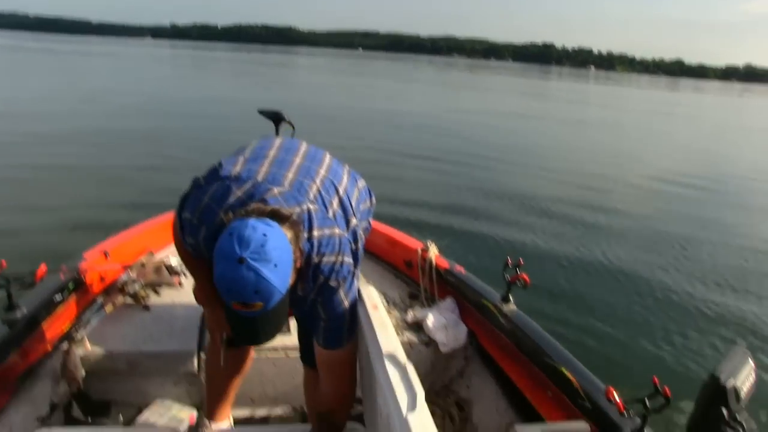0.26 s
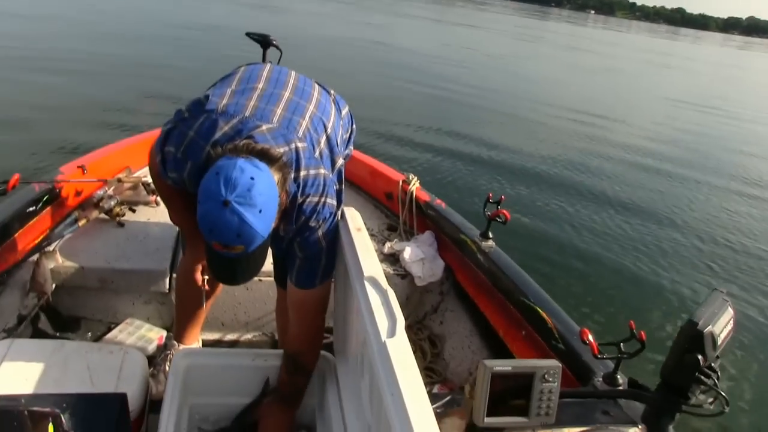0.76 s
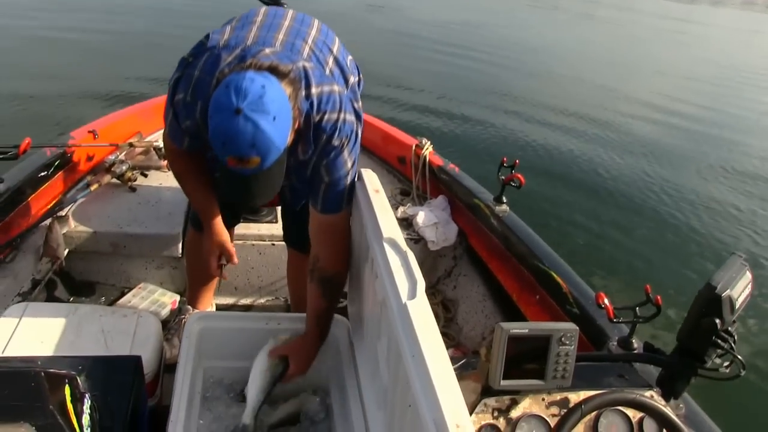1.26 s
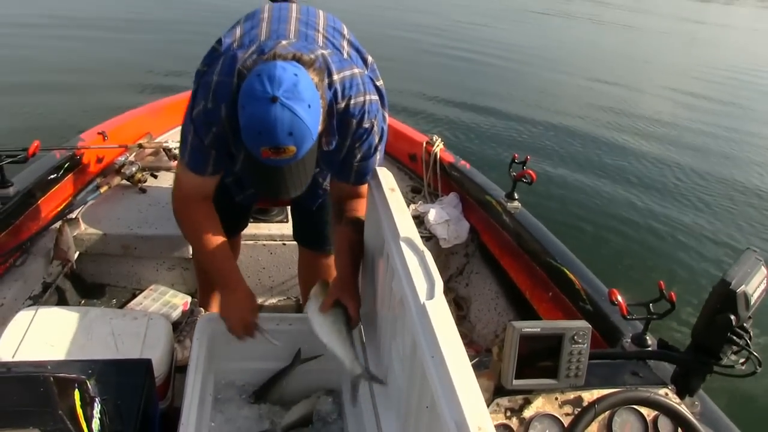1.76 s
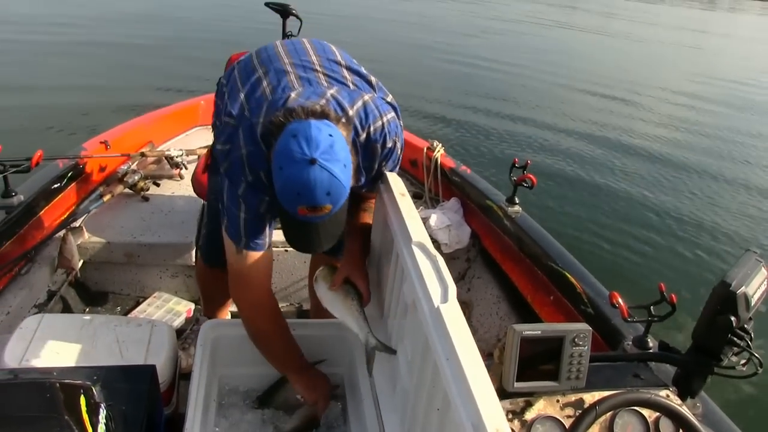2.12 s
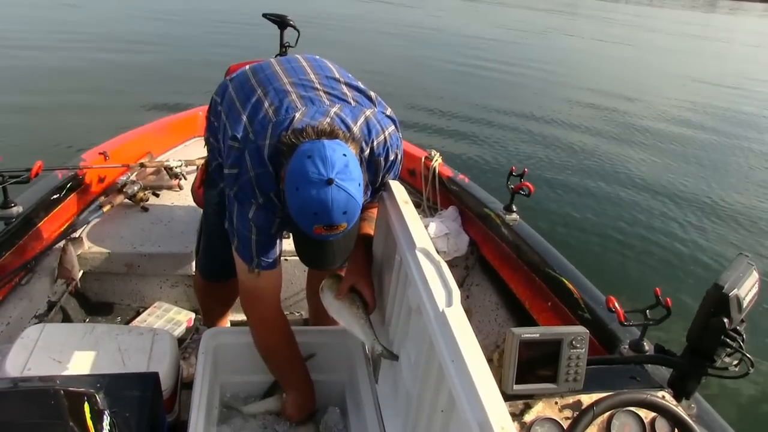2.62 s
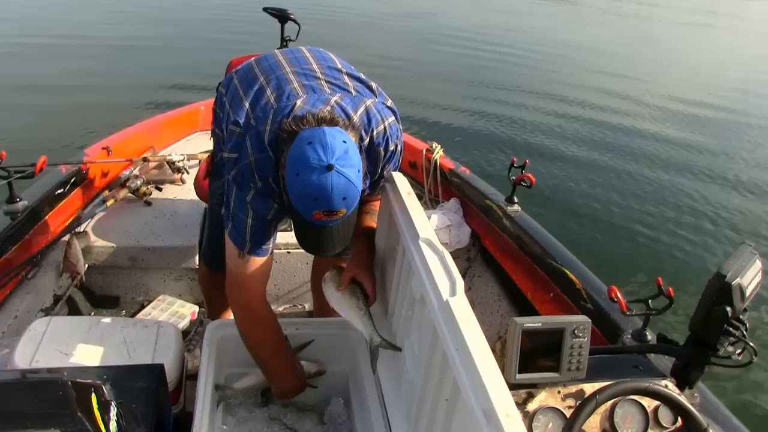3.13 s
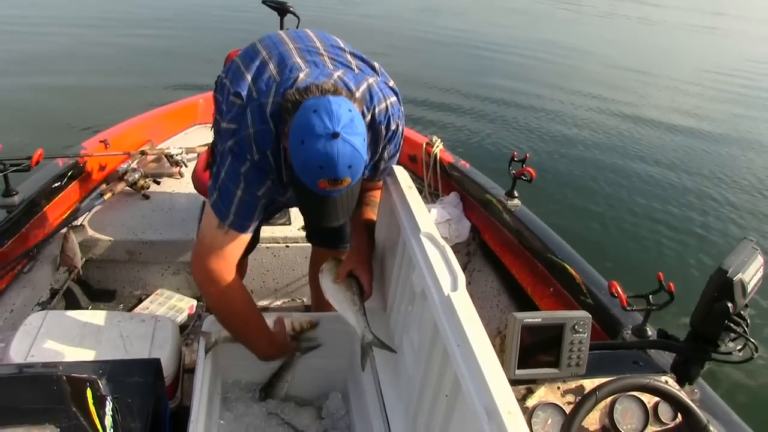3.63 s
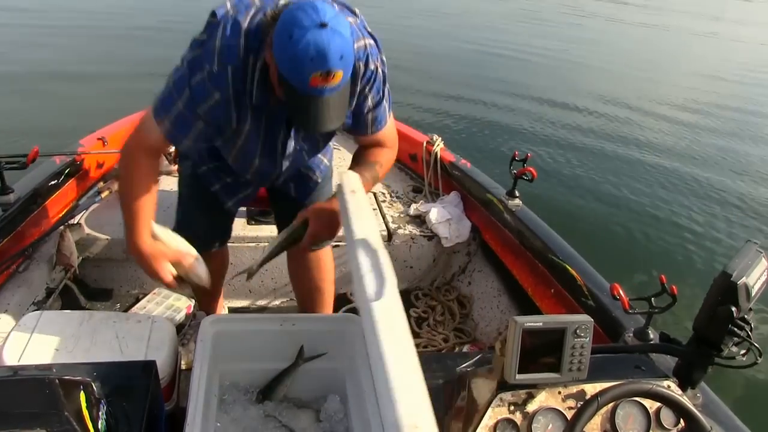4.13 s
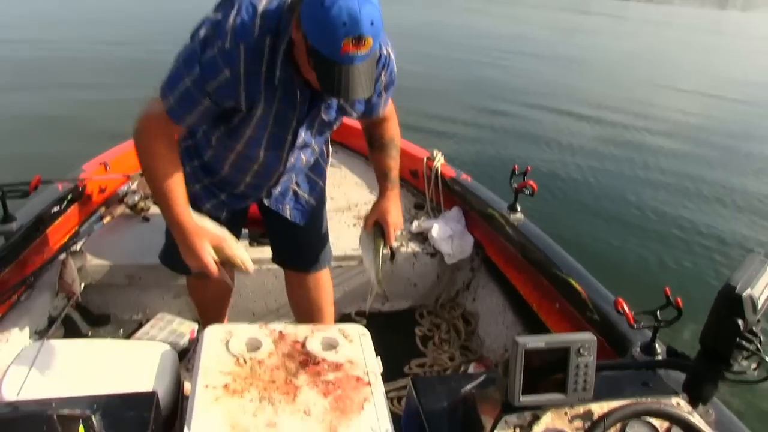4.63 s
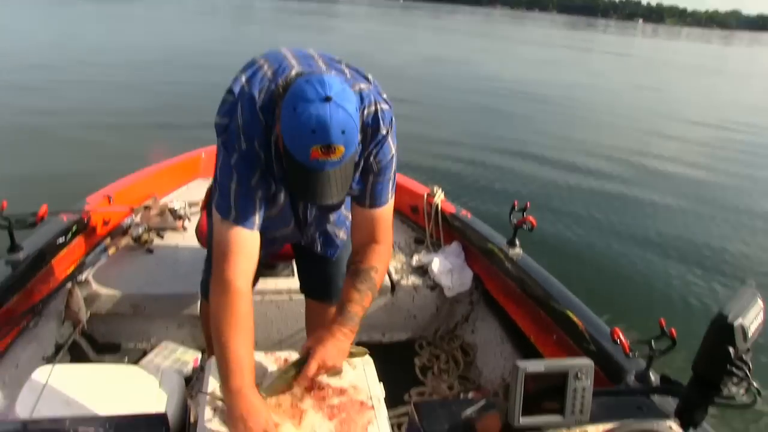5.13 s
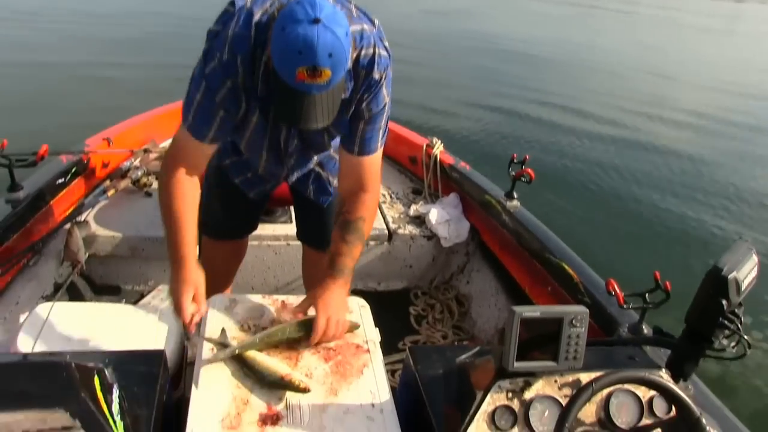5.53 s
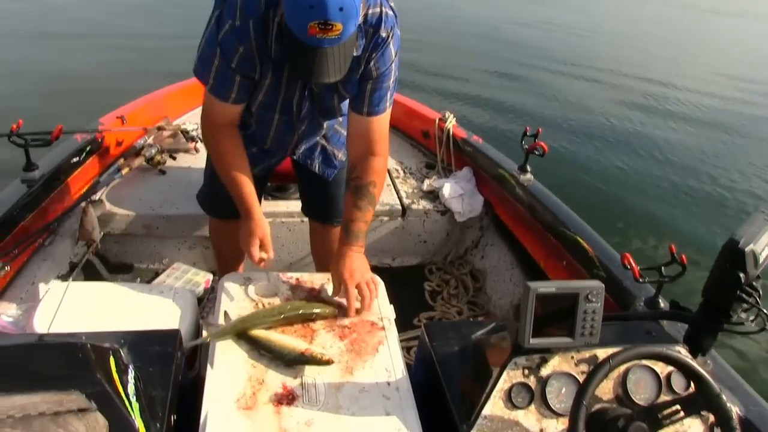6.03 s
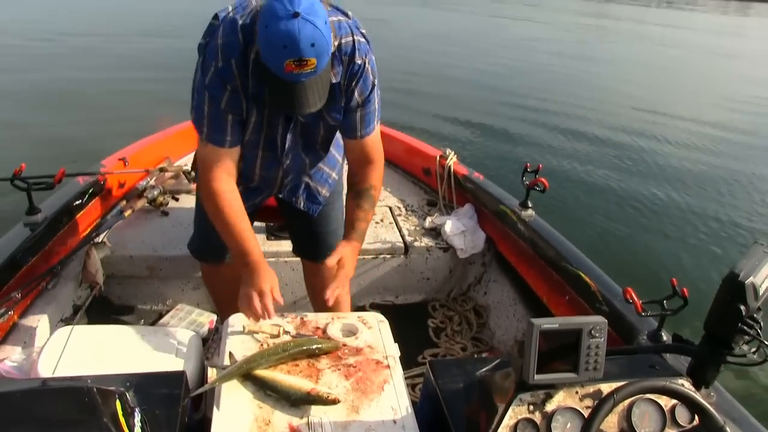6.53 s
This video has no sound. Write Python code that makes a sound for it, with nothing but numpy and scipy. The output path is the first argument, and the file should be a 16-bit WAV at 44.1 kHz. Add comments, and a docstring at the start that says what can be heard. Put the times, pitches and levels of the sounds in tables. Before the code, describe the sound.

On a small boat on a lake, hands dig through crushed ice in a plastic cooler. The ice crunches in bursts while bigger chunks clack together and knock the walls. The digging thins to light ticks, then the lid drops shut with a thump. Fish slap onto the lid and slide over it with soft scrapes and a few light knocks. A low lake rumble and faint hiss lie underneath.

```python
"""On a small boat on a lake, hands dig through crushed ice in an open plastic cooler.
Thousands of tiny clicks blend into a crunch, while bigger chunks crack together and knock the walls.
The lid drops shut and dulls the ice; fish are slapped on it, making it ring, and slid over it.
The boat adds a few quick echoes, and a low lake rumble and faint hiss lie underneath."""
import sys
import numpy as np
from scipy import signal
from scipy.io import wavfile

SR = 44100
rng = np.random.default_rng(int(sys.argv[2]) if len(sys.argv) > 2 else 0)


def file_out(sig):
    """Save sig as 16-bit WAV at sys.argv[1]."""
    # one column per channel
    cols = np.atleast_2d(sig).T
    # limit, then scale
    lim = np.clip(cols, -1, 1)
    pcm = np.round(lim * 32767).astype(np.int16)
    wavfile.write(sys.argv[1], SR, pcm)


N = 298557
LID_SHUTS_S = 4.6

# loose ice settling between strokes of the hands: t/s, crunch level/dB
SETTLING_ICE = [(0.03, -59.5), (.24, -53), (.3, -48.5), (.51, -46), (1.6, -46.5), (1.86, -59.5),
                (2.08, -59), (2.2, -42), (2.9, -50.5), (3.2, -52), (3.37, -61), (3.55, -54.5),
                (3.85, -57.5), (4.13, -54.5), (4.25, -80), (4.45, -60.5), (4.55, -73), (4.9, -78)]
# borders between four pitch ranges, heard as thud, knock, clack and crack: f/Hz
RANGE_EDGES = [450, 1300, 6000]


def ice_crunch():
    """Crushed ice shifts under the hands in countless tiny clicks; the shut lid blocks its treble."""
    # digging strokes and the lid's jolt: start/s, peak/s, end/s, crunch/dB, rumble/dB, box/dB, crackle/dB
    strokes = [(.522, .728, 0.79, -29, -34, -30, -45), (.81, .904, 1.085, -29.5, -36, -32, -51),
               (1.005, 1.128, 1.25, -20, -45, -25, -33), (1.26, 1.36, 1.39, -25, -45, -26, -37.5),
               (1.425, 1.559, 1.65, -39, -48, -36.5, -52), (1.68, 1.844, 1.89, -54, -62, -53, -58.5),
               (2.11, 2.146, 2.3, -37.5, -37.5, -38.5, -59), (2.42, 2.55, 2.9, -36.5, -42, -45, -47.5),
               (2.565, 2.6, 2.66, -22.5, -27.5, -20, -37), (2.63, 2.69, 2.7, -31, -39, -30.5, -40.5),
               (2.72, 2.74, 2.84, -38.5, -41, -42, -48), (3.63, 3.735, 3.81, -41, -45, -47.5, -58.5),
               (4.6, 4.612, 4.635, -23.5, -11, -20.5, -36), (4.625, 4.715, 4.843, -34.5, -39, -37, -36.5)]
    # tone of the crunch: f/Hz, relative level/dB
    tone = [(110, -20), (205, 0), (280, -6), (385, -3), (490, -7), (600, -2), (900, -5), (1250, -11),
            (1700, -8), (2150, -4), (2850, -12), (4000, -12), (5200, -16), (6500, -24), (9700, -34),
            (11800, -27), (16000, -42)]
    gains = stroke_gains(strokes, SETTLING_ICE, rest_mix_db=[-2.5, -3, -6.5, -9.5])
    crunch = grains(gains, tone, per_s=10000, size_db=2.4, clump_db=1.7, flicker_db=1.3, cycles=20)
    muffled = signal.sosfilt(signal.butter(2, 2840, fs=SR, output="sos"), crunch)
    return np.where(np.arange(N) < LID_SHUTS_S * SR, crunch, muffled)


def ice_chunks():
    """Chunks of ice hit each other and the walls, and the open cooler rings."""
    # collisions: t/s, clack/dB, thud/dB, knock/dB, hardness/dB, contact/ms
    hits = [(.258, -42, -26, -34, 14, 3.4), (.2808, -33, -30, -28.5, -4, 0.92),
            (.3548, -29, -28.5, -39.5, 15.5, 2.6), (.374, -33, -39, -50, 18, 2),
            (.4361, -20, -39, -53, -2, 2.4), (.4746, -28, -51, -46, 10, 2.1),
            (.5257, -21, -55, -24, -6, 1.9), (.5609, -14, -47, -21.5, 2, 1.9),
            (.5962, -18.5, -23, -26, 24, 0.42), (.6823, -38, -14, -13, 0, 1.35),
            (.696, -12.5, -23, -40, -21, 1.5), (.7265, -26, -6.5, -45, 6.5, 1.7),
            (.7334, -21, -24.5, -17, 9.5, 2.4), (.851, -19.5, -46, -26, 4, 1.5),
            (.9185, -20, -29, -16, 0, 1.4), (.9926, -12.5, -32, -32, 4, 0.84),
            (1.045, -12, -46.5, -16, 8, 1.8), (1.0604, -3.5, -29.5, -34, 5, 1.14),
            (1.092, -16, -17, -18, -5, 1.5), (1.1229, -23, -20, -5.5, -1, 0.82),
            (1.1306, -11, -18, -27, 1, 0.29), (1.1369, -10.5, -47, -13, 19.5, 1.2),
            (1.1804, -17, -26, -13, -8, 2.2), (1.2042, -9, -37, -40, 2, 1.3),
            (1.2191, -7, -47, -15.5, -5, 3), (1.2334, -14, -33, -8, 13, 0.66),
            (1.3105, -6, -46, -23, 1, 0.82), (1.3348, -6.5, -27, -15, 5, 0.23),
            (1.3529, -6.5, -43, -7.5, 14, 0.57), (1.3927, -12, -39, -16, 2, 1.4),
            (1.4159, -1.5, -46, -18, 7.5, 1.77), (1.4431, -17.5, -40, -36, -5, 1.27),
            (1.4568, -19, -33, -15, 8, 3.3), (1.4801, -12.5, -13, -3.5, 1, 1.03),
            (1.516, -8, -36, -22, 4, 2.5), (1.5478, -11.5, -31, -9.5, 1.5, 1.3),
            (1.5703, -24, -48, -47, -13, 0.6), (1.5768, -17.5, -47, -50, -16, 1.4),
            (1.5953, -15.5, -48, -55, -13, 0.85), (1.6209, -21, -57, -47, -16, 0.78),
            (1.6467, -19.5, -48, -27.5, -16, 2), (1.734, -33, -56, -23, 6, 1.3),
            (1.8317, -31, -48, -23.5, -2, 1.2), (2.113, -49, -36, -37, 29, 1.7),
            (2.147, -17, -6, -19, -9, 0.91), (2.151, -2.5, -26, -5, 3, 1.04),
            (2.1953, -15, -24, -24, 3, 1.7), (2.2162, 1.5, -46, -44, 9.5, 0.43),
            (2.2234, -5.5, -38, -45, 13, 1), (2.2944, -22.5, -8.5, -28, -1, 4.9),
            (2.3366, -13.5, -51, -51, 4, 2.1), (2.362, -10, -37, -53, 8, 2.7),
            (2.4344, -13, -49, -49, -2, 1.92), (2.4508, -12, -55, -51, 7.5, 1.6),
            (2.4833, -19.5, -30, -39, 11.5, 3.8), (2.515, -20.5, -21.5, -17, 0, 1.8),
            (2.595, -11.5, -36, -18, 2, 2.4), (2.6211, -8.5, -16, -7, -5, 0.77),
            (2.6913, -8.5, -15, -5.5, -6, 1.55), (2.704, -20, -18, -24, -16, 2.7),
            (2.7628, -23, -39, -29, 3, 1.7), (2.9013, -31.5, -55, -28.5, 15, .6),
            (2.9924, -36, -37, -34, 15, 0.68), (3.245, -34, -41, -41, 11.5, 1.2),
            (3.5135, -34, -53, -41, -2, 2.47), (3.711, -31, -18, -37, 10, 3.8),
            (4.1124, -28.5, -35, -24.5, -31, 1.6), (4.1644, -42, -58, -42, -10, 1.4),
            (4.4258, -40, -66, -38, -3, 1.6)]
    # ringing tones of the open cooler, one list per pitch range: f/Hz, level/dB, time to fade 60 dB/s
    cooler_modes = [
        [(178, -29, 0.017), (200.7, 9, 0.063), (234, -12.5, 0.047), (389, 17, 0.04)],
        [(573, 16.5, 0.02), (695, 15.5, 0.041), (956, -14, 0.075), (940, -13, 0.0073)],
        [(1550, -7.5, 0.04), (2234, 9.5, 0.026), (2920, 6, 0.029), (3430, -13, 0.0054), (4380, -48, 0.0029),
         (4800, -39, 0.0052)],
        [(5850, -12, 0.00495), (6760, 31.5, 0.004), (8300, -10, 0.004), (10500, 34.5, 0.0028),
         (14200, -35, 0.0022)],
    ]
    return blows(hits + stray_chips(), cooler_modes, snap_db=24.5, detune=0.048)


def stray_chips():
    """Small chips tick at random until the lid shuts, louder when the settling ice is louder."""
    gaps, sizes, hardness = rng.random((150, 3)).T
    times = np.cumsum(-np.log(gaps)) / 30  # about 30 a second
    levels = np.interp(times, *np.transpose(SETTLING_ICE)) + 7.5 + 8 * sizes
    return [(s, db, db - 25, db - 12, 0.5 + 10 * hard, 3.8)  # same columns as the chunks' hits
            for s, db, hard in zip(times, levels, hardness) if s < LID_SHUTS_S]


def lid_knocks():
    """The lid drops shut and fish slap onto it; each blow makes the plastic ring."""
    # blows on the lid: t/s, clack/dB, thud/dB, knock/dB, hardness/dB, contact/ms
    hits = [(4.596, -9, -9.5, -17, 4.5, 1.9), (4.6029, -22.5, 3, -5.5, 4.5, 1.5),
            (4.7165, -21, -24, -49, -15, 3.4), (5.023, -14, -15.5, -9, -5, 0.5),
            (5.269, -15, -27, -21, 11.5, 2.84), (5.3012, -29.5, -48, -52, 20, 0.78),
            (5.3204, -36, -53, -56, 20, 0.62), (5.3353, -44, -53, -56, 13, 1.17),
            (5.3636, -46, -50, -53, 23, 0.39), (5.374, -36, -53, -45, 13, 0.51),
            (5.3972, -27.5, -34, -34.5, 17.5, 3.7), (5.6468, -28, -48, -24, 10.5, 1.3),
            (5.6603, -28.5, -35, -33, 1, 1.6), (5.9084, -23, -31, -21, 17.5, 2.15),
            (6.3018, -42, -34, -47, -10, 3.9), (6.421, -28, -24, -28.5, -1, 1.4),
            (6.4793, -24.5, -21.5, -21, 5, 1.64), (6.4871, -21, -21.5, -18.5, -5, 0.96),
            (6.5293, -26.5, -33, -29, -18, 2.7)]
    # ringing tones of the shut lid, one list per pitch range: f/Hz, level/dB, time to fade 60 dB/s
    lid_modes = [
        [(67, -17.5, 0.17), (121, -36, 0.17), (186, -33, 0.069), (212, 2.5, 0.1), (320.6, -5, 0.09),
         (372, 1, 0.038)],
        [(474, 2.5, 0.043), (650, 8, 0.054), (775, 5, 0.025), (960, -3, 0.009), (1023, 12.5, 0.045)],
        [(1420, 4, 0.03), (2450, 5, 0.012), (2705, 8, 0.021), (3710, 10.5, 0.012), (4300, 12, 0.0067),
         (4810, -37.5, 0.024)],
        [(5920, 21, 0.0033), (6700, 20, 0.0018), (8300, -23, 0.0025), (11100, 15.5, 0.003), (13600, -4, 0.003)],
    ]
    return blows(hits, lid_modes, snap_db=18, detune=0.047)


def lid_scrape():
    """The lid brushes shut, then hands and fish slide on it: dense clicks that blur into a scrape."""
    # the lid's closing swish, then slides:
    # start/s, peak/s, end/s, scrape/dB, rumble/dB, lid body/dB, hiss/dB
    strokes = [(4.57, 4.596, 4.6, -54, -42, -46, -63), (5.03, 5.035, 5.08, -38, -24.5, -31, -50.5),
               (5.28, 5.285, 5.3, -59, -42, -61, -55), (5.57, 5.642, 5.89, -58.5, -57, -59, -78),
               (5.82, 5.92, 6.2, -54, -66, -54, -60.5), (5.935, 6.021, 6.04, -37.5, -38, -39.5, -45),
               (6.29, 6.304, 6.41, -49.5, -41, -49.5, -54.5), (6.42, 6.534, 6.57, -46, -33, -38.5, -52.5)]
    # hands and fish shifting lightly between strokes: t/s, scrape level/dB
    shifting = [(5.2, -75), (5.3, -57), (5.55, -58.5), (5.82, -56.5), (6.05, -64.5), (6.28, -62.5),
                (6.6, -58), (6.77, -56.5)]
    # tone of the scrape: f/Hz, relative level/dB
    tone = [(29, -32), (50, 10.5), (291, 3.5), (495, 4), (646, -9), (884, -1.5), (1910, -9), (4450, -9),
            (9640, -44), (12900, -32.5), (16000, -40.5)]
    gains = stroke_gains(strokes, shifting, rest_mix_db=[0, -1.5, -9, -15])
    return grains(gains, tone, per_s=12000, size_db=2, clump_db=0.8, flicker_db=1, cycles=18)


def blows(hits, modes, snap_db, detune):
    """Each short, gritty contact makes a dry snap and sets off a body's ringing tones (its modes)."""
    out, t = np.zeros(N + SR), np.arange(SR // 8) / SR
    snaps = [band(band(t == 0, k), k) for k in range(4)]
    for s, clack_db, thud_db, knock_db, hard_db, contact_ms in hits:
        crack_db = clack_db - 17 + hard_db  # a harder contact cracks louder
        bright_db = hard_db - 10  # and clacks brighter
        contact_s = contact_ms / 1000
        grit = rng.standard_normal(2048) * t[:2048] * np.exp(-t[:2048] / contact_s)
        push = np.hanning(int(SR * (contact_s + 0.00032)))  # low modes feel one smooth push
        dull = signal.lfilter([.3], [1, -.7], grit)
        tilted = amp(-bright_db) * dull + amp(bright_db) * (grit - dull)
        parts = [(thud_db, push), (knock_db, grit), (clack_db, tilted), (crack_db, grit)]
        start, chance = round(s * SR), rng.standard_normal((4, 2, 8))
        for k, (peak_db, force) in enumerate(parts):
            hz, mode_db, fade_s = np.transpose(modes[k])[:, :, None]
            strength, shift = chance[k, :, :len(hz), None]
            hz = hz * np.exp(detune * k * shift)  # no two blows share their higher modes
            start_db = mode_db + 0.5 * bright_db * np.log2(hz / hz.mean()) + (5.5 + k) * strength
            ring = np.sum(amp(start_db - 60 * t / fade_s) * np.sin(2 * np.pi * hz * t), axis=0)
            if k > 0:  # the thud has no snap, the crack has the most
                ring += amp(snap_db + 11.8 * (k == 3)) * snaps[k] / snaps[k].max()
            sound = signal.fftconvolve(ring, force)[:len(t)]
            out[start:start + len(t)] += amp(peak_db) * sound / np.abs(sound).max()
    return out[:N]


def grains(gains, tone, per_s, size_db, clump_db, flicker_db, cycles):
    """Clicks of uneven size come in clumps; each rings at three pitches and dies within `cycles` swings."""
    sizes = amp(size_db * np.minimum(rng.exponential(1, N), 4)) * rng.choice([-1, 1], N)
    happens = rng.random(N) < per_s / SR * amp(clump_db * drift(50))
    clicks = sizes * happens * amp(clump_db * drift(90)) + 1e-18
    pitch_set, ranges = rng.integers(0, 11, N), np.zeros((4, N))
    for k, hz in enumerate(np.geomspace(70, 15000, 33)):
        decay, angle = amp(-60 * hz / (cycles * SR)), 2 * np.pi * hz / SR
        feedback = [1, -2 * decay * np.cos(angle), decay * decay]
        ring = signal.lfilter([1, 0, -1], feedback, clicks * (pitch_set == k % 11))
        ranges[np.searchsorted(RANGE_EDGES, hz)] += amp(at_hz(tone, hz)) * np.sqrt(hz) * unit_level(ring)
    crunch, rumble, body, crackle = gains
    return sum(gain * unit_level(amp(flicker_db * drift(45)) * band(ranges[k], k))
               for k, gain in enumerate([rumble, body, crunch, crackle]))


def stroke_gains(strokes, rest_levels, rest_mix_db):
    """Four loudness curves: each stroke swells, sags and lets go, above a quiet resting level."""
    rest_db = np.interp(np.arange(N) / SR, *np.transpose(rest_levels))
    gains = amp(rest_db + np.array(rest_mix_db)[:, None])
    for start, peak, end, *levels in strokes:
        times = [start - 0.0027, start, peak, end, end + 0.1]
        shape_db = np.interp(np.arange(N) / SR, times, [-40, -10, 0, -12.5, -84.1])
        gains += amp(levels)[:, None] * amp(shape_db) * (shape_db > -40)
    return gains


def bass_cut(x, hz):
    """A small body gives off little sound below its lowest ringing tone."""
    return signal.sosfilt(signal.butter(4, hz, "high", fs=SR, output="sos"), x)


def hull_echoes(x):
    """The open boat returns a few quick echoes, different on each side; the bass stays in the middle."""
    # echoes off the hull: left delay/ms, left level/dB, right level/dB
    echoes = [(1.3, -17, -39.5), (2.9, -63, -42), (5.3, -12, -23), (8.9, -18.5, -11)]
    out = np.array([x, x])
    bright = signal.sosfilt(signal.butter(1, 500, "high", fs=SR, output="sos"), x)
    for k, (ms, left_db, right_db) in enumerate(echoes):
        for side, db in enumerate([left_db, right_db]):
            lag = round(ms * (1 + .23 * side) * SR / 1000)  # later on the right
            out[side, lag:] += (-1) ** (k + side) * amp(db) * bright[:-lag]
    return out


def lake():
    """The lake's low rumble and faint hiss: bands of stereo noise, each wavering a little in level."""
    # tone of the lake: f/Hz, relative level/dB
    tone = [(15, -62), (25, -24.5), (126, -2.5), (193, -9), (305, -17), (410, -18.5), (848, -19.5),
            (1140, -33), (1410, -23.5), (2490, -31), (15500, -40.5)]
    # how alike the two ears hear it: f/Hz, likeness (1 = the same)
    likeness = [(60, 1), (180, 0.88), (550, 0.067), (1650, 0.35), (5000, 0.76), (15000, 0.28)]
    edges = 25 * 2 ** np.arange(0, 9.6, .5)  # Hz, half an octave apart
    out, shared_drift = 0, drift(3)
    white = rng.standard_normal((2, 2, N))
    for k, (low, high) in enumerate(zip(edges, edges[1:])):
        band_pass = signal.butter(2, [low, high], "band", fs=SR, output="sos")
        mid, side = signal.sosfilt(band_pass, white[k % 2])
        hz = np.sqrt(low * high)
        alike = at_hz(likeness, hz)
        gain = amp(at_hz(tone, hz) + 1.1 * shared_drift + 1.1 * drift(10))
        out = out + gain * (np.sqrt(1 + alike) * mid + np.sqrt(1 - alike) * side * [[1], [-1]])
    return amp(-48) * unit_level(out)


def amp(db):
    """Turn decibels into a gain."""
    return 10 ** (np.asarray(db) / 20)


def unit_level(x):
    """Scale a signal to an average (rms) level of 1."""
    return x / np.sqrt(np.mean(x ** 2) + 1e-20)


def at_hz(points, hz):
    """Read between a table's rows, spacing frequencies by octaves."""
    frequencies, values = np.transpose(points)
    return np.interp(np.log(hz), np.log(frequencies), values)


def drift(hz):
    """A smooth random wobble of size about 1, mostly slower than `hz`."""
    pole = np.exp(-2 * np.pi * hz * 20 / SR)  # one step every 20 samples
    noise = rng.standard_normal(N // 20 + 2002)
    slow = signal.lfilter([1], [1, -2 * pole, pole * pole], noise)[2000:]
    return np.interp(np.arange(N) / 20, np.arange(len(slow)), unit_level(slow))


def band(x, k):
    """Keep one of the four pitch ranges, from 0 (lowest) to 3 (highest)."""
    edges = [40, *RANGE_EDGES, 17000]
    return signal.sosfilt(signal.butter(2, edges[k:k + 2], "band", fs=SR, output="sos"), x)


def scene():
    """Ice and lid echo in the boat, over the sound of the lake."""
    crunch, scrape, water = ice_crunch(), lid_scrape(), lake()
    lid = bass_cut(scrape + lid_knocks(), hz=63.8)
    ice = bass_cut(crunch + ice_chunks(), hz=146)
    return hull_echoes(ice + lid) * amp([[.4], [-.4]]) + water  # the cooler is a touch to the left


def record(dry):
    """Clip the loudest peaks and cut the highest treble."""
    low_pass = signal.cheby2(16, 80, 16000, fs=SR, output="sos")
    return signal.sosfilt(low_pass, np.clip(dry, -.92, .92))


dry = scene()
out = record(dry)
file_out(out)
```